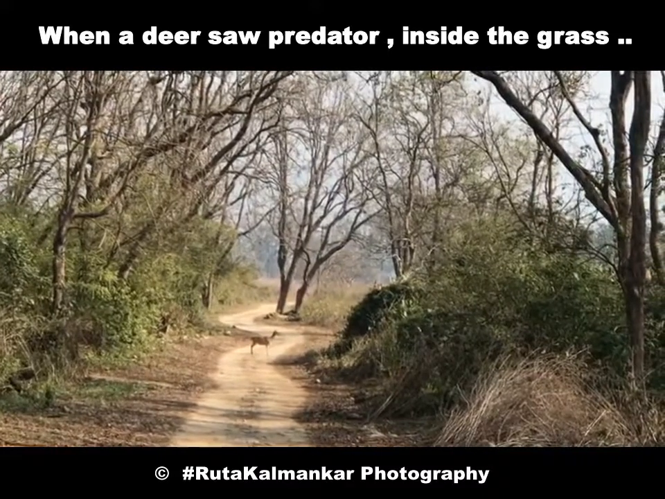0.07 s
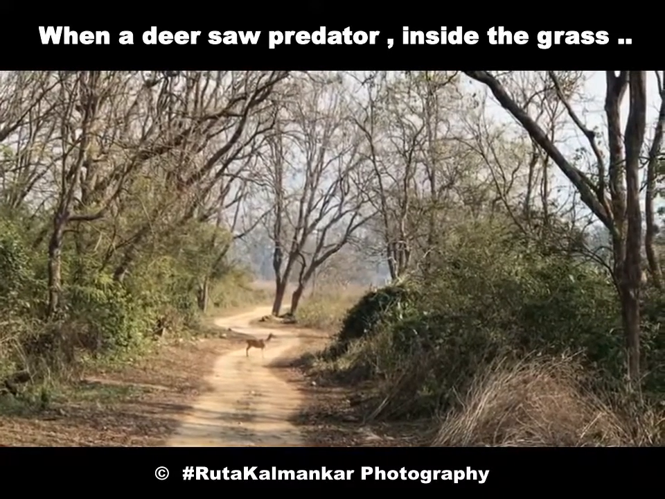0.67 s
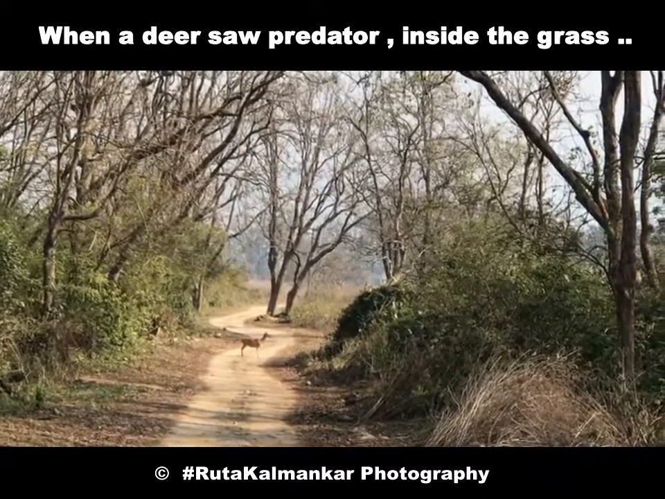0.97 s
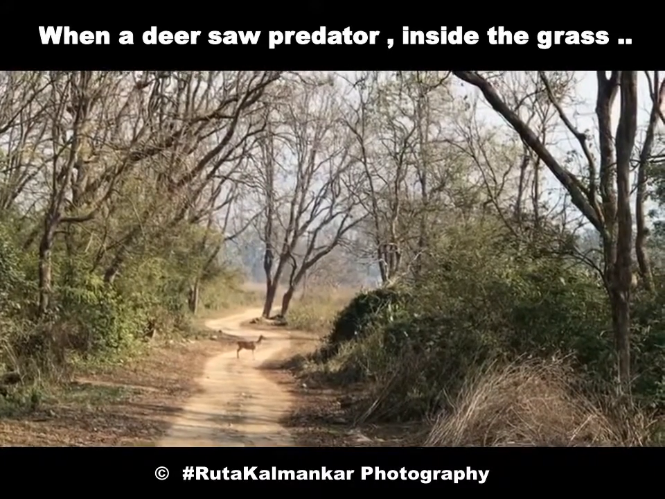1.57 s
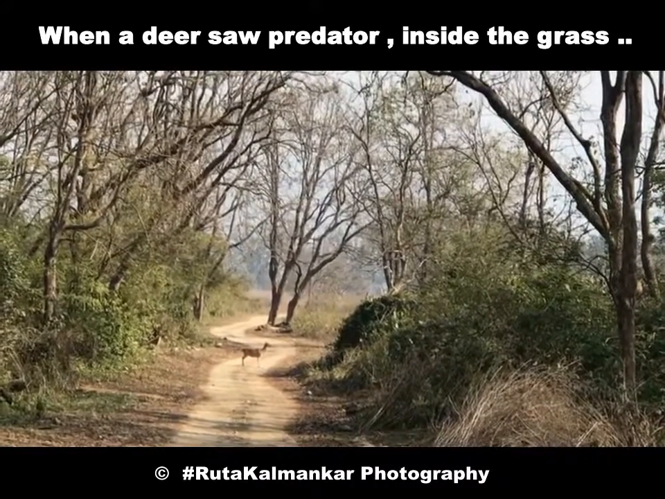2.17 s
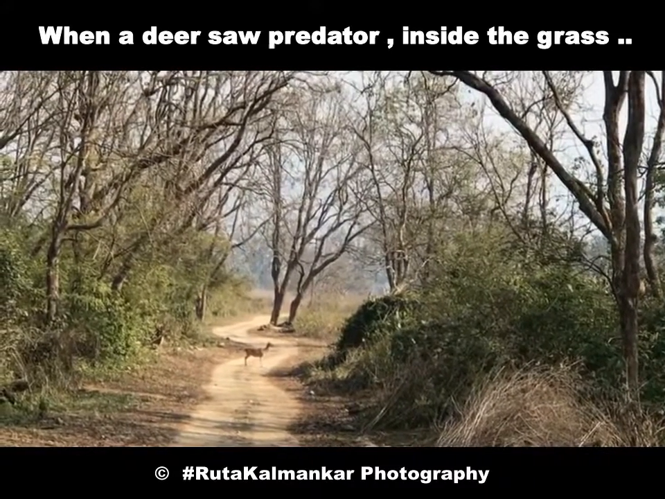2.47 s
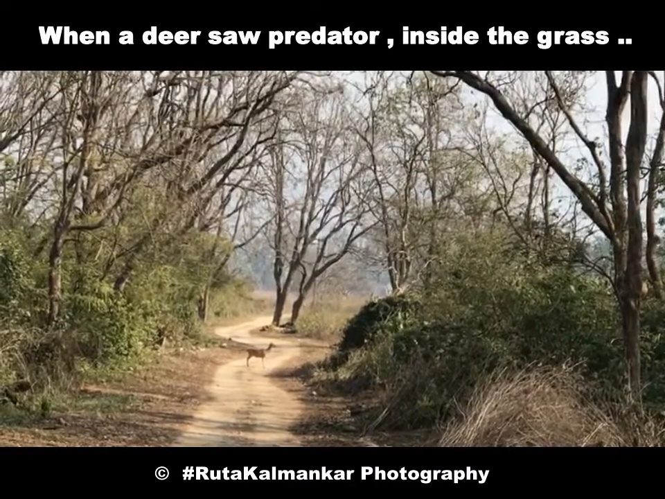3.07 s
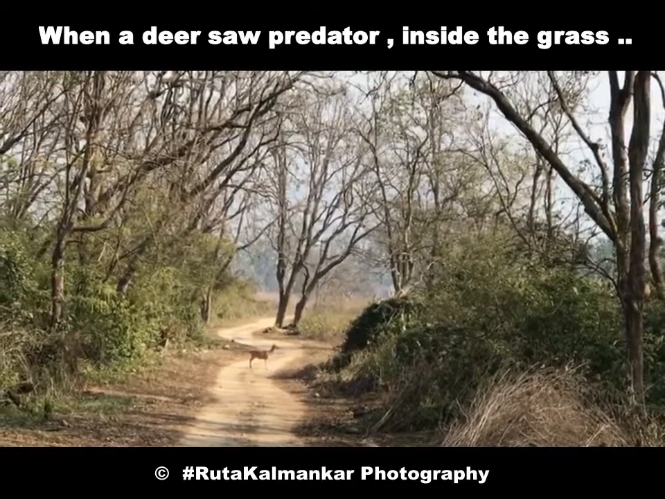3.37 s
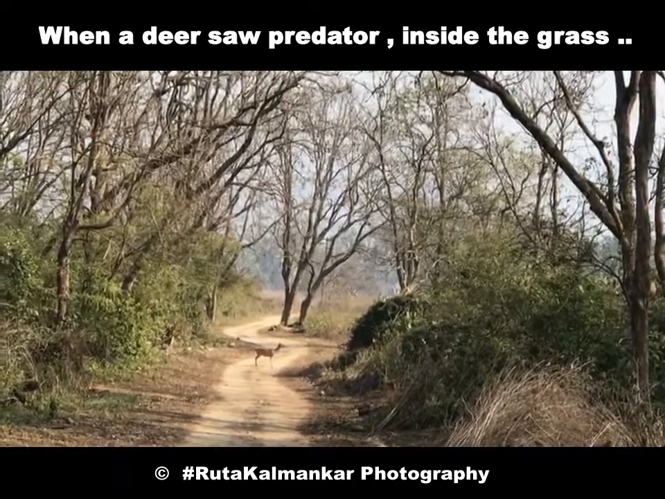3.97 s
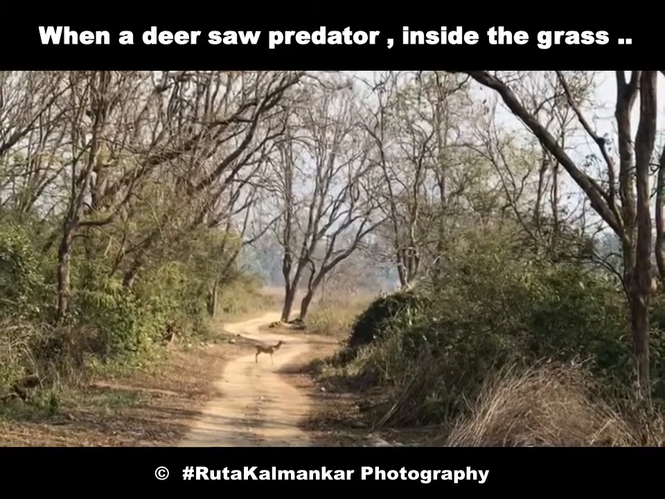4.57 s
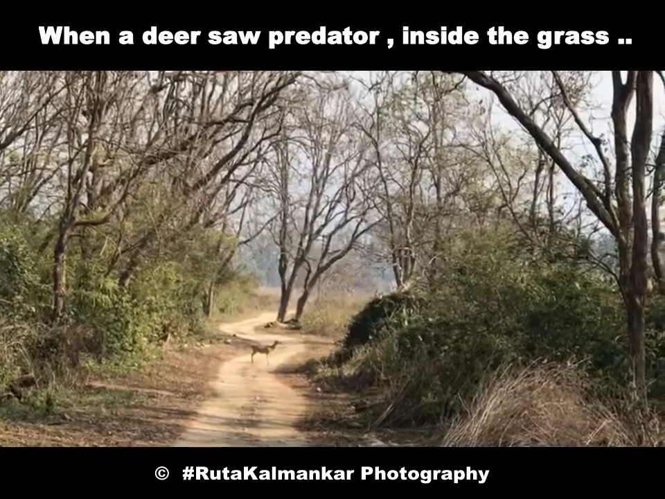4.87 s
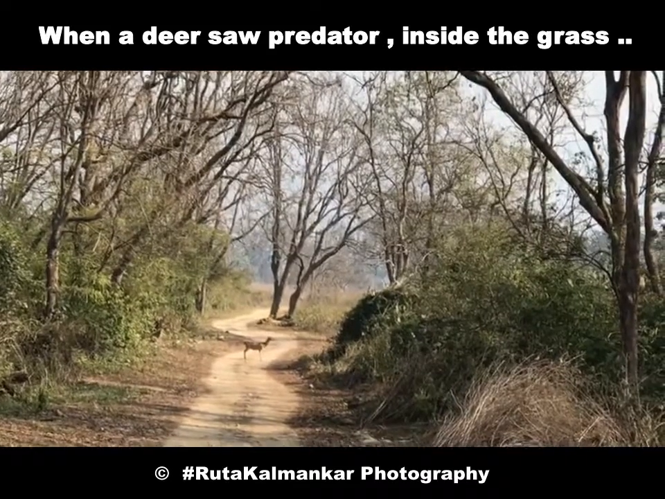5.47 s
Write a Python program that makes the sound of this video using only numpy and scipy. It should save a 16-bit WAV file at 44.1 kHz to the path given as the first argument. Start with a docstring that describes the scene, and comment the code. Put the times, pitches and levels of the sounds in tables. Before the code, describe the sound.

The place is quiet woodland, with a soft, restless low rumble and the faint hum of a distant engine throughout. Light wind swells gently in the far treetops. From about 0.3 to 1.1 seconds a small bird nearby gives a handful of quick, thin, very high chirps. Faint whistles from distant birds are scattered through the rest, with a barely audible high insect buzz. A few dry twigs tick faintly in the first three seconds, and air bumps softly on the microphone between 1.3 and 2.6 seconds. At about 4.2 seconds a spotted deer gives a single shrill alarm yelp, by far the loudest sound, lasting a quarter of a second. It holds a clean high pitch, then cracks, turns rough and drops in steps. Its echo fades among the trees over about a second, leaving the rumble and faint birds until 5.5 seconds.

```python
"""One shrill yelp cracks and drops at its end, and the trees echo it: a spotted deer's alarm call.
The vocal folds in its throat buzz cleanly while tight, then turn rough as they go slack.
Small birds chirp nearby and whistle far off, an insect's wings buzz, and dry twigs tick.
Underneath are a distant engine, a low rumble, wind in the treetops, light air on the microphone
and the camera's faint whine."""
import sys
import numpy as np
from scipy import signal
from scipy.fft import rfft, irfft, next_fast_len
from scipy.io import wavfile
from scipy.ndimage import map_coordinates

SR = 44100
rng = np.random.default_rng(int(sys.argv[2]) if len(sys.argv) > 2 else 0)


def wrap_up_sound(samples):
    """Save the sound to the file named by the first command line argument, as 16-bit audio."""
    columns = np.atleast_2d(samples).T
    # keep every value between -1 and 1, then stretch to whole-number steps
    tamed = np.clip(columns, -1, 1)
    steps = np.round(tamed * 32767).astype(np.int16)
    wavfile.write(sys.argv[1], SR, steps)


N = 242991

# the deep sound of air pushing on the microphone: (frequency [Hz], relative level [dB])
BUFFET = [(12, -3), (28, -6.5), (42, 8), (70, 8), (110, -29.5), (250, -47.5)]


def amp(db):
    """Turn decibels into a number to multiply a sound by."""
    return 10 ** (np.asarray(db) / 20)


def unit(x):
    """Scale a sound so its average strength (rms) is 1."""
    return x / np.sqrt(np.mean(x ** 2) + 1e-20)


def clock():
    """The time of each sample, in seconds."""
    return np.arange(N) / SR


def ramp(start_s, length_s):
    """A straight rise from 0 to 1."""
    return np.clip((clock() - start_s) / length_s, 0, 1)


def hump(peak_s, length_s):
    """A bell-shaped rise and fall."""
    return np.exp(-(2 * (clock() - peak_s) / length_s) ** 2)


def along(points, hz):
    """Read between (frequency, value) points, with octaves evenly spaced."""
    frequencies, values = np.transpose(points)
    return np.interp(np.log(hz + 1), np.log(frequencies + 1), values)


def curves(rows):
    """Join a table's rows with straight lines: one curve for each column after the time."""
    times, *columns = np.transpose(rows)
    return [np.interp(clock(), times, column) for column in columns]


def wobble(rate):
    """A smooth curve through `rate` random values a second."""
    return map_coordinates(rng.standard_normal(int(N * rate / SR) + 4), [clock() * rate])


def phase_of(hz):
    """How far a wave has turned, in radians, as its pitch moves."""
    return 2 * np.pi * np.cumsum(hz) / SR


def filtered(x, response):
    """Turn each frequency up or down by response(hz)."""
    size = next_fast_len(N + SR // 2)
    return irfft(rfft(x, size) * response(np.fft.rfftfreq(size, 1 / SR)), size)[:N]


def noise(spectrum):
    """Noise of strength 1, shaped by a (frequency, level) table."""
    return unit(filtered(rng.standard_normal(N), lambda hz: amp(along(spectrum, hz))))


def echo(x, fade_times, build_s):
    """Sound bounces off many trunks: the echo builds, then each frequency fades at its own speed."""
    hz, age, bands = signal.stft(rng.standard_normal(2 * SR), SR, nperseg=256)
    fade = amp(-60 * age / along(fade_times, hz)[:, None])
    tail = signal.istft(bands * fade, SR, nperseg=256)[1]
    tail *= 1 - np.exp(-(np.arange(len(tail)) / SR / build_s) ** 2)
    # the middle frequencies set how loud the echo is
    mids = signal.sosfilt(signal.butter(2, [500, 2500], "band", fs=SR, output="sos"), tail)
    return signal.fftconvolve(x, tail / np.linalg.norm(mids) * np.sqrt(4000 / SR))[:N]


def whine(spacing_hz=995.5, level_db=-87, step_db=-0.71):
    """The camera's electronics give ten faint, steady, evenly spaced tones."""
    out = np.zeros(N)
    for k in range(2, 12):
        cycles = k * spacing_hz * clock() + rng.random()
        out += amp(level_db + step_db * (k - 1.5)) * np.sin(2 * np.pi * cycles)
    return out


def rumble(trim_db=-1.5, restless_db=0.56):
    """A low, restless rumble from far away."""
    # its rise and fall: (time [s], level before the trim [dB])
    loudness = [(0.02, -50.5), (0.37, -54), (0.57, -51.5), (1.56, -56), (1.78, -50.5), (2.15, -56.5),
                (2.96, -53), (3.38, -56.5), (3.47, -54), (3.55, -53.5), (3.79, -50), (3.85, -52),
                (5.05, -51.5), (5.48, -52)]
    # its tone: (frequency [Hz], relative level [dB])
    spectrum = [(30, -35), (48, -14.5), (66, 0), (100, -4.5), (135, -1.5), (175, 1.5), (220, -7), (270, 2),
                (340, -8), (420, -11), (560, -24.5), (900, -48.5)]
    level_db, = curves(loudness)
    return amp(level_db + trim_db + restless_db * wobble(8)) * noise(spectrum)


def breeze(start_db=-69.5, growth_db_per_s=2.8, calm_db=-83, puff_db=2.5):
    """A light breeze builds, puffs on the microphone and then drops; leaves hiss softly."""
    # how loud the leaves are: (time [s], level [dB])
    leaf_levels = [(0, -70), (1.1, -71), (2.05, -73), (2.6, -71.5), (5.51, -71.5)]
    # the tone of their hiss: (frequency [Hz], relative level [dB])
    leaf_spectrum = [(300, -6.5), (900, 4), (1250, 0.5), (1600, -0.5), (2000, -3), (3000, -4), (3700, -5.5),
                     (4200, -3.5), (4800, -11), (5400, -8), (6500, -7), (7700, -12), (9500, -11.5),
                     (10400, -17.5), (11400, -14), (12100, -41)]
    breeze_db = start_db + growth_db_per_s * clock()
    buffet_db = breeze_db + (calm_db - breeze_db) * ramp(start_s=3.02, length_s=.25)
    buffet = amp(buffet_db + puff_db * wobble(4.5)) * noise(BUFFET)
    hiss_db, = curves(leaf_levels)
    return buffet + amp(hiss_db) * noise(leaf_spectrum)


def air_bumps():
    """Small swirls of air bump softly against the microphone."""
    # one swirl a row: (peak time [s], length [s], level [dB])
    swirls = [(1.29, 0.067, -48.5), (1.73, 0.078, -52), (2.213, .05, -55), (2.394, 0.026, -47.5),
              (2.58, 0.13, -53)]
    return sum(amp(db) * hump(peak_s, length) for peak_s, length, db in swirls) * noise(BUFFET)


def treetops(rest_db=-72, swell_db=13.5):
    """Each swell of wind raises a soft rush in the far treetops."""
    # swells of wind: (peak time [s], length [s], strength [0-1])
    swells = [(0.035, 0.3, 0.87), (.64, 0.59, 0.7), (1.924, 0.34, 0.68), (3.107, 0.49, 0.51),
              (3.71, 0.21, 0.58), (4.95, 1, 0.37), (5.5, 0.29, 0.78)]
    # the tone of the rush: (frequency [Hz], relative level [dB])
    spectrum = [(200, -23.5), (400, -1), (490, 2), (560, -2.5), (680, -3.5), (800, -14.5), (1100, -23),
                (2000, -47)]
    wind = sum(strength * hump(peak_s, length) for peak_s, length, strength in swells)
    return amp(rest_db + swell_db * wind) * noise(spectrum)


def engine(start_hz=102.5, slowing_hz_per_s=1.05, firing_trim_db=-.5, octave_trim_db=1.0):
    """A far engine slows down; its firing tone and the tone an octave above fade in and out."""
    # the two tones before their trims: (time [s], firing level [dB], octave level [dB])
    tone_levels = [(0.0, -74, -55), (0.5, -59.5, -58.5), (0.92, -70, -57), (1.09, -55, -57),
                   (1.38, -63.5, -60.5), (1.6, -51.5, -64), (1.86, -66, -56), (1.95, -52.5, -59),
                   (2.22, -61.5, -60.5), (3.65, -58.5, -58.5), (3.82, -63, -54.5), (4.73, -53.5, -61.5),
                   (5.45, -56.5, -52), (5.51, -52, -55)]
    firing_db, octave_db = curves(tone_levels)
    pitch = start_hz - slowing_hz_per_s * clock()
    phase = phase_of(pitch * (1 + .007 * wobble(16)))
    firing = amp(firing_db + firing_trim_db + wobble(9.9)) * np.sin(phase)
    octave = amp(octave_db + octave_trim_db + 2.5 * wobble(18)) * np.sin(2 * phase)
    return np.sqrt(2) * (firing + octave)


def insect(level_db=-81, wing_hz=92.5, centre_hz=7030, sweep_hz=1100, scatter_hz=100):
    """Every wing stroke is a tiny shrill pulse that slides down in pitch."""
    wing_rate = wing_hz * (1 + .003 * wobble(2))
    stroke = np.cumsum(wing_rate) / SR % 1  # runs from 0 to 1 in each stroke
    pitch = centre_hz + sweep_hz * (.5 - stroke) + scatter_hz * wobble(270)
    pulses = np.sin(np.pi * stroke) ** 2.6 * amp(1.1 * wobble(90))
    buzz = unit(pulses * np.sin(phase_of(pitch)))
    return amp(level_db) * ramp(start_s=0.56, length_s=0.59) * buzz


def twigs(sharpness=2.34):
    """Dry twigs tick: each is a quickly fading burst of noise around one frequency."""
    # one tick a row: (time [s], level [dB], centre frequency [Hz], time to fade by 60 dB [s])
    ticks = [(.040, -62.5, 8800, 0.05), (.043, -61.5, 1600, 0.24), (1.07, -63.5, 2740, .17),
             (1.151, -68, 2600, 0.095), (1.283, -64.5, 1600, .08), (2.355, -57, 1350, 0.028),
             (2.797, -63, 1300, .077)]
    out = np.zeros(N)
    for start_s, db, centre_hz, fade_s in ticks:
        age = clock() - start_s
        hiss = rng.standard_normal(N)
        crack = filtered(hiss, lambda hz: 1 / (1 + (sharpness * np.log((hz + 1) / centre_hz)) ** 4))
        out += (age > 0) * amp(db - 60 * abs(age) / fade_s) * unit(crack)
    return out


def whistles(notes, waver):
    """Bird notes whose pitch slides fast at first and then settles."""
    out = np.zeros(N)
    unsteady = 1 + waver * wobble(160)
    for start_s, length, first_hz, last_hz, db in notes:
        progress = np.linspace(0, 1, int(length * SR))
        start = int(start_s * SR)
        span = slice(start, start + len(progress))
        pitch = (last_hz + (first_hz - last_hz) * (1 - progress) ** 2) * unsteady[span]
        swell = np.sqrt(abs(np.sin(np.pi * progress)))
        out[span] += amp(db) * swell * np.sin(phase_of(pitch))
    return out


def far_birds(chatter_count=60, chatter_db=-79):
    """Birds whistle deep in the wood, over a faint chatter of random notes."""
    # clearer notes: (start [s], length [s], first pitch [Hz], last pitch [Hz], relative level [dB])
    clear_notes = [(.06, .25, 2890, 2775, -73), (1.21, 0.05, 3650, 3100, -70.5),
                   (1.3, 0.03, 3300, 2470, -69), (1.38, 0.045, 3140, 3030, -69),
                   (1.44, .04, 2700, 2150, -68), (1.48, 0.033, 3160, 2970, -67),
                   (1.55, 0.13, 1776, 1703, -72.5), (2.55, 0.041, 2220, 1497, -67),
                   (2.78, 0.15, 1610, 1590, -69.5), (2.86, 0.028, 2090, 1970, -68),
                   (3.035, 0.054, 2740, 2503, -65), (3.18, 0.1, 2100, 1626, -72),
                   (3.22, .12, 2490, 2350, -73.5), (3.33, .08, 1650, 1608, -69),
                   (3.46, .2, 5250, 5460, -77), (3.51, 0.028, 2415, 2050, -69),
                   (3.72, 0.082, 2650, 2510, -67), (4.03, 0.1, 5500, 5580, -70),
                   (4.12, 0.017, 2720, 2670, -64), (4.49, .03, 6833, 6470, -65),
                   (4.55, .034, 6315, 6290, -65.5), (5.42, .08, 2200, 1756, -71.5)]
    clear = whistles(clear_notes, waver=.025)
    chatter = []
    for when, length, height, slide in rng.random((chatter_count, 4)):
        first_hz = 1500 * 2 ** height
        last_hz = first_hz * 2 ** (0.292 * (.5 - slide))
        chatter.append((5.3 * when, .03 + .05 * length, first_hz, last_hz, chatter_db))
    return clear + whistles(chatter, waver=0.017)


def near_birds():
    """Small birds give thin whistles and short chirps that sweep up, then fall quickly."""
    # thin whistles: (start [s], length [s], first pitch [Hz], last pitch [Hz], level [dB])
    thin_notes = [(.015, .15, 8060, 7540, -72), (.492, .14, 7900, 7470, -73.5),
                  (.473, .025, 3250, 3700, -68), (1.112, .055, 3240, 3590, -72.5)]
    # chirps, before the arch shapes them: (start [s], length [s], pitch [Hz], level [dB])
    chirps = [(0.277, 0.028, 5630, -52.5), (0.348, 0.034, 5630, -51), (0.497, 0.014, 5140, -56.5),
              (0.842, 0.039, 5800, -53), (0.914, 0.034, 5720, -51.5), (1, 0.052, 5820, -51.5),
              (1.139, 0.0088, 5250, -54)]
    # the arch of one chirp: (progress [0-1], share of the pitch [0-1], level change [dB])
    arch = [(0, .79, -20), (.25, .9, -12.5), (.55, .97, -4.5), (.72, 0.98, -9), (.87, .94, -6),
            (1, .76, -21)]
    steps, pitch_share, arch_db = np.transpose(arch)
    out = whistles(thin_notes, waver=0.006)
    for start_s, length, hz, db in chirps:
        progress = np.linspace(0, 1, int(length * SR))
        pitch = hz * np.interp(progress, steps, pitch_share)
        loudness = amp(db + np.interp(progress, steps, arch_db))
        out[int(start_s * SR):][:len(progress)] += loudness * np.sin(phase_of(pitch))
    return out


def deer(tight_rough=0.037, slack_rough=0.39, crack_s=4.328, release_s=.009):
    """A clean, high yelp turns rough as the vocal folds go slack and the pitch falls in steps."""
    # the yelp rises, holds, sags and drops: (time [s], pitch [Hz], level [dB], overtone boost [dB])
    yelp = [(4.171, 816, -60, 2), (4.191, 992.7, -37, -2.5), (4.237, 998, -34, 1),
            (4.282, 980, -35.5, -6.5), (4.305, 975, -37, 1), (4.333, 953.5, -34.5, -0.5),
            (4.342, 890, -38, -0.5), (4.353, 900, -35, 1.5), (4.361, 762, -43, 3.5),
            (4.382, 762, -43.5, -3.5), (4.388, 587, -42.5, -5), (4.413, 580, -47, -20)]
    # how the throat shapes the overtones: (frequency [Hz], relative level [dB])
    throat = [(1100, -18.5), (1550, -1), (2000, -1), (2350, -21.5), (2720, -17.5), (3000, -24), (3700, -30),
              (4000, -37), (4800, -64), (6000, -44.5), (7300, -52), (8900, -41), (10000, -72)]
    # air rushing through the throat: (frequency [Hz], relative level [dB])
    breath_spectrum = [(400, -15), (800, -4.5), (1600, 4), (2400, -17), (3400, -3), (4700, -25),
                       (5900, -7.5), (7300, -23), (8500, -13.5), (11000, -53)]
    pitch, level_db, overtone_db = curves(yelp)
    start_s, end_s = yelp[0][0], yelp[-1][0]
    sounding = (clock() > start_s) * (1 - ramp(end_s - release_s, release_s))
    rough = tight_rough + (slack_rough - tight_rough) * ramp(crack_s, length_s=0.036)
    # roughness shakes both the pitch and the loudness
    shake = 1 + 0.084 * rough * wobble(450) + 0.0056 * wobble(900)
    flutter = amp(7 * rough * wobble(350))
    phase = phase_of(pitch * shake)
    overtones = sum(amp(along(throat, k * pitch)) * np.cos(k * phase) for k in range(2, 11))
    voice = -np.sqrt(2) * (np.cos(phase) + amp(overtone_db) * overtones) * flutter
    # slack folds beat unevenly, every second cycle stronger
    voice *= 1 + 0.28 * rough * wobble(120) * np.cos(phase / 2)
    # air escapes in one puff per cycle; the flow drops with the pitch
    puffs = 1 + .5 * np.sin(phase)
    flow = (pitch / pitch.max()) ** 3 * amp(3 * wobble(70))
    breath = amp(-25) * flow * (1 + 3.2 * rough) * noise(breath_spectrum) * puffs
    return sounding * amp(level_db) * (voice + breath)


def scene():
    """Mix the forest: near sounds arrive directly, the far birds only as echoes."""
    # echo of the trees beside the track: (frequency [Hz], time to fade by 60 dB [s])
    thicket = [(300, 0.24), (1000, 0.33), (2000, 0.26), (4000, 0.32), (10000, .1)]
    # longer echo of the deep wood: (frequency [Hz], time to fade by 60 dB [s])
    wood = [(200, 0.83), (600, 2.2), (1000, 1.66), (2000, 1.55), (3000, 1.1), (5500, 0.8), (10000, 0.37)]
    yelp = deer()
    call = yelp + amp(-9) * echo(yelp, thicket, build_s=.12)
    call += amp(-14) * echo(yelp, wood, build_s=.075)
    near, far = near_birds(), far_birds()
    birds = near + amp(-1) * echo(near, wood, build_s=0.0037)
    birds += amp(1) * echo(far, thicket, build_s=0.0023)
    birds += amp(-7.5) * echo(far, wood, build_s=0.0028)
    ticks = twigs()
    undergrowth = ticks + amp(-6.5) * echo(ticks, wood, build_s=0.0081)
    background = insect() + engine() + treetops() + rumble() + breeze() + air_bumps() + whine()
    return (background + undergrowth + birds + call)[None]


def record(dry, top_hz=12100):
    """The camera cuts off the very highest frequencies."""
    return filtered(dry[0], lambda hz: hz < top_hz)[None]


dry = scene()
out = record(dry)
wrap_up_sound(out)
```